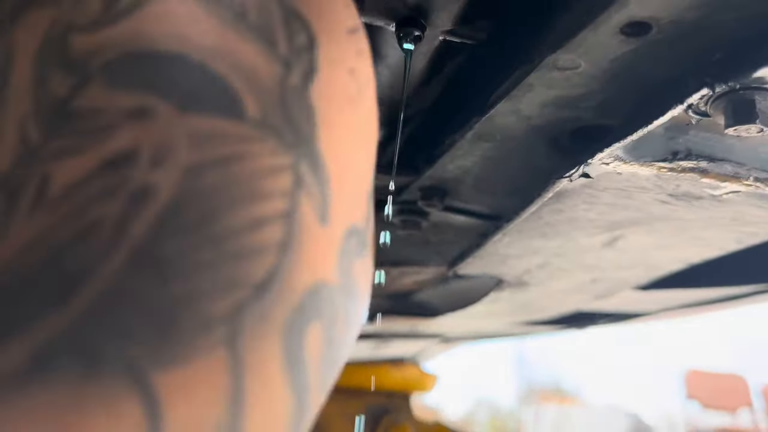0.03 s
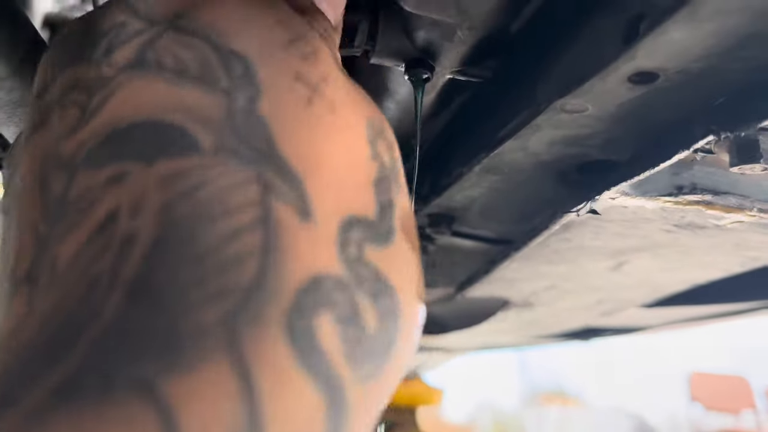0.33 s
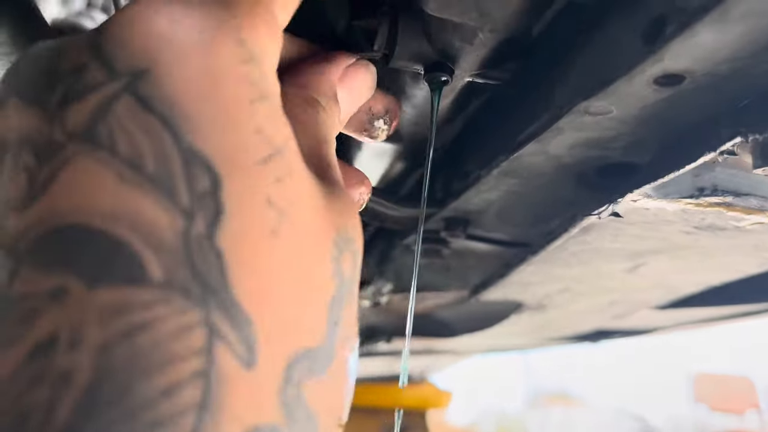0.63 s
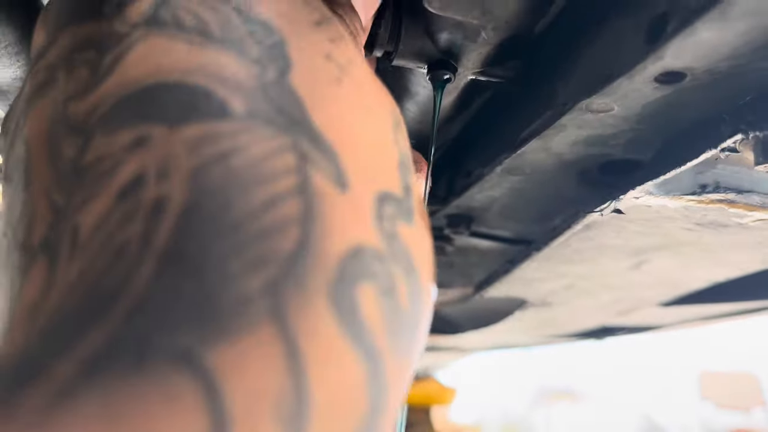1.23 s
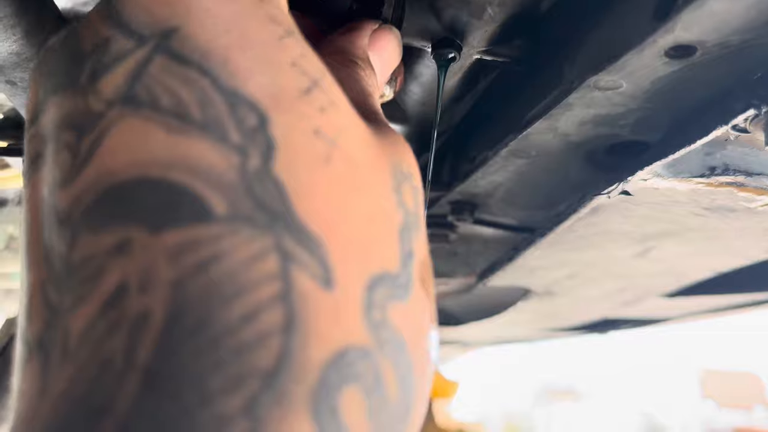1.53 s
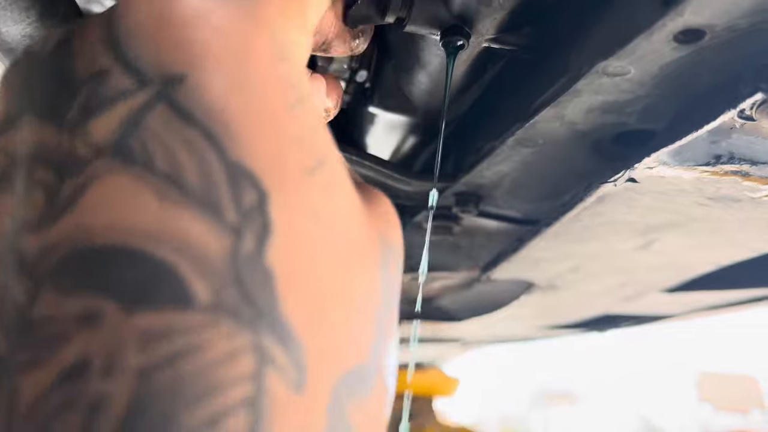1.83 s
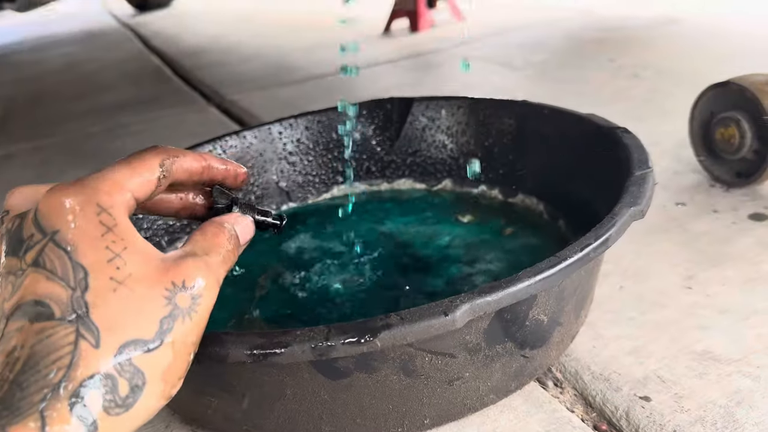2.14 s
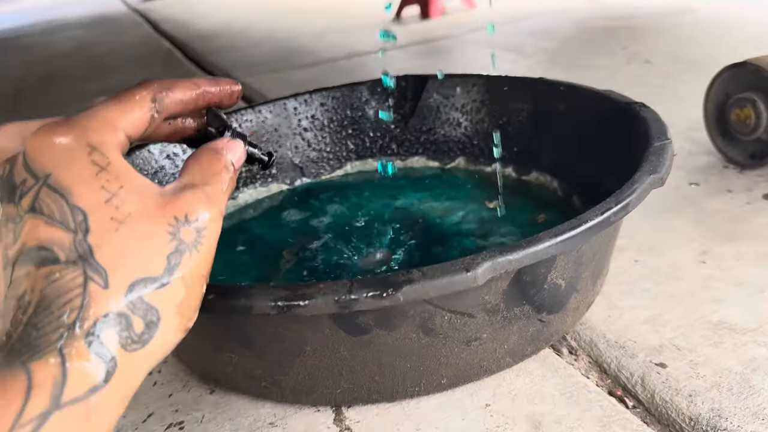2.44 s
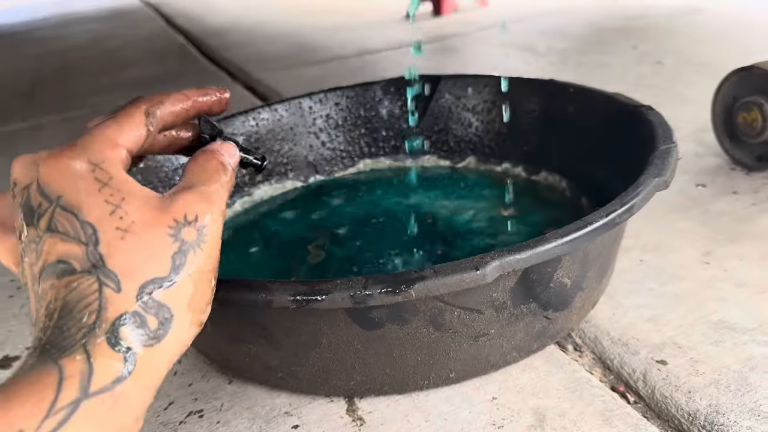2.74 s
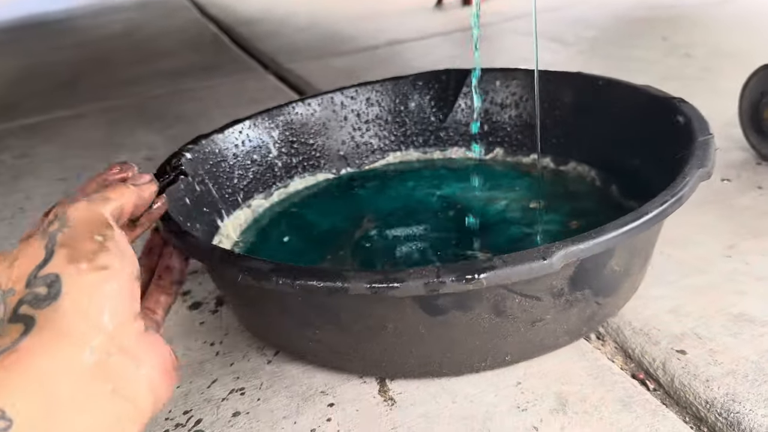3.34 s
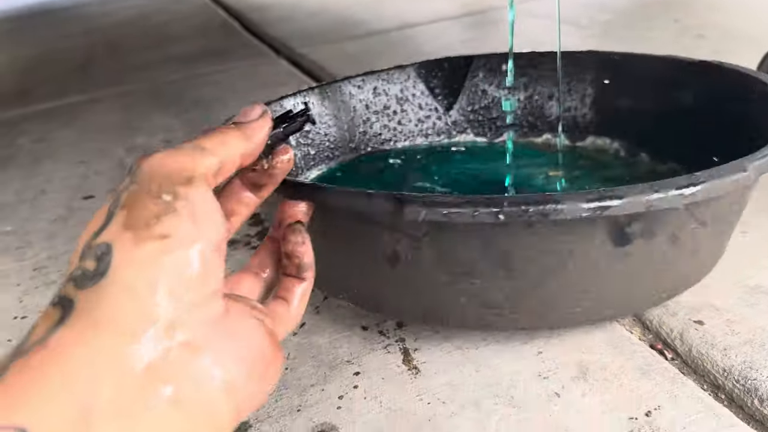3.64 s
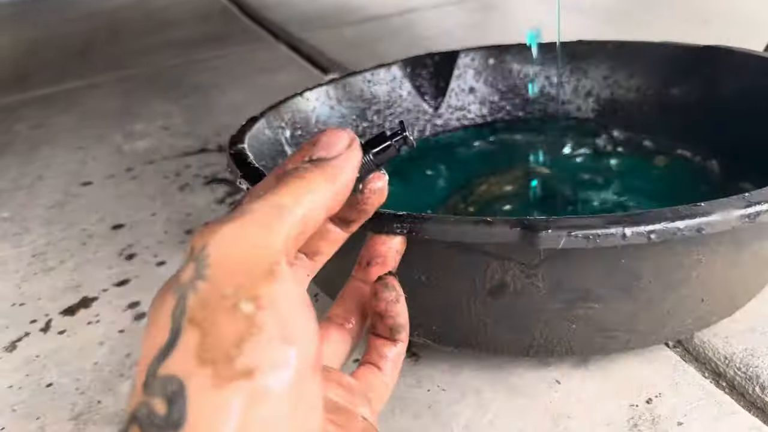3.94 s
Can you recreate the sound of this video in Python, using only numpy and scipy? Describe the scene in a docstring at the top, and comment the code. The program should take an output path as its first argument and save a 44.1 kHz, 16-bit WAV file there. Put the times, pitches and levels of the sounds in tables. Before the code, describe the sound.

Trickling liquid ticks faintly beneath a car, then is heard up close, splashing into a half-full drain pan with wet drops and small plinking bubbles. The engine idles throughout with a steady low hum and rumble.

```python
"""A few thin drips tick over an idling engine: coolant is trickling from a drain under a car.
After two seconds the level dips briefly and we are beside the half-full plastic drain pan,
where the broken stream patters and fizzes. Each drop is a wet crack, a tiny ringing bubble and
a short echo off the pan's walls; trapped bubbles plink and the pool gurgles softly.
Underneath, the engine hums at multiples of its cycle rate, throbs once a cycle and rumbles."""
import sys
import numpy as np
from scipy import signal
from scipy.fft import rfft, irfft, next_fast_len
from scipy.io import wavfile
from scipy.ndimage import uniform_filter1d, map_coordinates

SR = 44100
rng = np.random.default_rng(int(sys.argv[2]) if len(sys.argv) > 2 else 0)


def transcribe(u):
    """Save the signal u as a 16-bit wav file named by the first command-line argument.

    u: samples, shape (n,) or (channels, n), limited to [-1, 1]; the rate is SR.
    q: integer samples, one column per channel.
    """
    v = np.clip(np.atleast_2d(u).T, -1, 1)
    q = np.round(v * 32767).astype(np.int16)
    wavfile.write(sys.argv[1], SR, q)


N = 176400

# Single drips at the drain. Each row: start in seconds, level in dB, pitch in Hz.
DRAIN_DRIPS = [(0.4068, -35, 14050), (0.6149, -32.5, 14400), (0.658, -35.5, 13900), (0.6996, -42, 14400),
               (0.756, -35, 13900), (0.7763, -24, 14200), (0.811, -39, 13900), (0.8868, -27, 15350),
               (0.9168, -40, 14100), (0.9817, -37.5, 15150), (1.037, -46, 14500), (1.0935, -33.5, 14000),
               (1.2155, -41.5, 7870), (1.2526, -39.5, 15200), (1.2992, -35, 7700), (1.5307, -37, 14600),
               (1.8632, -46, 14300), (1.94, -34, 14500), (1.967, -34, 14100)]
# Fat drops in the pan. Each row: start in seconds, level in dB, pitch in Hz, slap send in dB.
FAT_DROPS = [(2.104, -27.5, 10900, -9), (2.121, -27, 6320, -9), (2.166, -32.5, 8500, -22),
             (2.2159, -22, 6580, -7), (2.305, -24.5, 13900, -27), (2.312, -29, 8050, -29),
             (2.3328, -29.5, 8050, -25), (2.3642, -27, 10960, -32), (2.3822, -28.5, 8230, -7),
             (2.4365, -30.5, 6840, -5), (2.4523, -23.5, 14500, -16.5), (2.51, -30, 8800, -2),
             (2.5251, -21.5, 7360, -25), (2.5628, -25, 7400, -18), (2.582, -20.5, 14500, -16),
             (2.593, -28, 7400, -17), (2.639, -27, 8770, -32), (2.6936, -16, 14660, -31),
             (2.696, -18.5, 8630, -20), (2.734, -28, 12100, -11), (2.771, -20.5, 14600, -14),
             (2.835, -20.5, 13800, -31), (2.8744, -29, 3630, -10.5), (2.882, -17, 14500, -18),
             (2.994, -18, 8060, -41), (3.0088, -16.5, 13700, -29), (3.025, -15.5, 14100, -25),
             (3.075, -24, 13700, -26), (3.1225, -26.5, 13800, -11), (3.233, -30.5, 8650, -6),
             (3.2483, -28, 13900, -13), (3.408, -27.5, 8270, -14), (3.5156, -30, 7840, -9.5),
             (3.626, -24.5, 5970, -23), (3.669, -24.5, 14100, -14.5), (3.734, -31, 8150, -25),
             (3.7596, -29, 8430, -8), (3.8749, -23, 8140, -33), (3.9356, -26, 7340, -17),
             (3.982, -22.5, 13700, -16)]
# Larger bubbles in the pan. Each row: start in seconds, level in dB, pitch in Hz.
BIG_BUBBLES = [(2.095, -34, 6720), (2.119, -34, 4100), (2.212, -32, 2430), (2.215, -44, 5700),
               (2.381, -38, 4310), (2.434, -29.5, 2500), (2.507, -38, 2630), (2.51, -32, 4740),
               (2.593, -33, 6550), (2.692, -37, 3400), (2.738, -39, 1850), (2.738, -50, 5080),
               (2.771, -38, 5940), (2.886, -33, 2270), (3.023, -35, 5250), (3.075, -45, 2840),
               (3.163, -31, 6600), (3.209, -31, 5050), (3.237, -31, 2670), (3.48, -31.5, 5140),
               (3.55, -39, 2440), (3.628, -29, 6030), (3.713, -35.5, 3730), (3.787, -32, 3320),
               (3.959, -35, 1015)]
# Fader rides for the landing stream and its gurgle. Each row: time in seconds, gain in dB.
FLOW_RIDE = [(2.03, 4.5), (2.2, 2), (2.29, -1), (2.4, -2), (2.49, -5), (2.54, -0.5), (2.75, 4), (2.95, 2.5),
             (3.1, 3.5), (3.29, 4), (3.45, 2), (3.76, 1), (3.84, -4.5), (4, -3)]
GURGLE_RIDE = [(2.03, -46), (2.22, -42.5), (2.33, -45.5), (2.43, -38), (2.5, -47), (2.56, -42), (2.75, -52),
               (2.95, -46), (3.12, -44), (3.45, -42.5), (3.6, -47), (3.78, -61), (3.96, -41.5)]
# Tone colours of the noise layers and the pan's echo. Each row: frequency in Hz, gain in dB.
SPLASH_EQ = [(500, -12), (1500, -25), (4000, -9), (6500, -10), (8500, 7.5), (10500, 4), (12500, 7.5),
             (14500, 3.5), (16000, 6)]
SLAP_EQ = [(600, -5), (2200, -0.5), (4500, 2.5), (7000, 6.5), (10000, -12), (16000, -33)]
PAN_ECHO_EQ = [(1000, -0.5), (6000, 12), (9000, -8), (15000, -8)]
FIZZ_EQ = [(400, -6), (1200, -3), (2400, 4), (3600, 2.5), (6500, 4.5), (8500, 7), (10500, -36.5),
           (12500, -4.5), (14500, 7), (16000, 0.5)]
GURGLE_EQ = [(300, -9.5), (560, 3.5), (850, 2.5), (1100, -4), (1600, -14), (3000, -19.5), (8000, -55)]
RUMBLE_EQ = [(20, -16), (45, -14), (80, 4), (150, -2.5), (260, -2.5), (380, -11), (520, -4.5), (700, -16),
             (1000, -20), (1600, -23.5), (2500, -31), (4000, -36), (7000, -43), (11000, -59.5),
             (15500, -51)]
# Stereo image of fizz and rumble. Each row: frequency in Hz, left-right likeness (1 is mono).
FIZZ_IMAGE = [(1000, 0.37), (4000, 0.063), (8000, 0.14), (14000, 0.8)]
RUMBLE_IMAGE = [(60, .98), (200, 0.41), (450, 0), (1000, 0.15), (2000, 0.0049), (8000, 0.034)]
# Idle speed, heard at each place. Each row: time in seconds, firings per second.
IDLE_DRAIN = [(0.1, 33.47), (0.65, 33.43), (1.12, 33.03), (1.5, 33.3), (1.68, 33.22), (1.92, 33.48)]
IDLE_PAN = [(2.1, 32.85), (2.25, 33.12), (2.5, 33.4), (3.17, 33.34), (3.3, 33.65), (3.66, 34.04)]
# The hum's tones at each place. Each row: multiple of the cycle rate, relative level in dB.
HUM_DRAIN = [(1, -38), (2, -28), (3, -25), (4, -2), (5, -19), (6, 0), (7, -25), (8, -6), (9, -16), (10, -9),
             (11, -18), (12, -3), (13, -17), (14, -20), (15, -20), (16, -30), (17, -25), (18, -16),
             (19, -28), (20, -25)]
HUM_PAN = [(1, -39), (2, -26), (3, -31), (4, 0), (5, -23), (6, 0), (7, -25), (8, -3), (9, -14), (10, -4),
           (11, -11), (12, -1), (13, -14), (14, -14), (15, -16), (16, -24), (17, -21), (18, -17), (19, -21),
           (20, -25)]
# Body resonances rung by the strongest firing. Each row: pitch in Hz, width in Hz, gain in dB.
BODY_MODES = [(451, 12, -2), (484, 11, 9), (579, 10, -9)]

MOVE_S, DIP_S = 2.003, 0.033  # move from drain to pan; half length of the dip
CRACK_T60_S, SLAP_T60_S, PAN_T60_S, BUBBLE_ECHO_T60_S = 0.013, 0.034, 0.055, 0.049
PATTER_PER_S, PATTER_DB = 65, -37.5
PLINKS_PER_S, PLINK_DB, PLINK_LOW_HZ, PLINK_OCTAVES = 54, -49, 694, 3.3
SPRAY_PER_S, SPRAY_DB, FIZZ_DB = 2300, -49, -46
SHADED_DB = -13  # extra cut on the pan's ticks and plinks, heard from the drain
EXHAUST_LAG_PERIODS, WALL_PHASE_HZ = 2.9, 374


def drop(hz, width_oct, skirt_db, echo_db):
    """One drop of peak 1: a wet crack, a tiny rising bubble and the pan's short echo."""
    def colour(f):
        bell = np.exp(-.5 * (np.log2((f + 1) / hz) / width_oct) ** 2)
        return amp(along(SPLASH_EQ, f)) * (amp(skirt_db) + bell)

    t = np.arange(SR // 20) / SR
    noise = rng.standard_normal((3, len(t)))
    crack = unit(filtered(noise[0], colour)) * amp(-60 * t / CRACK_T60_S)
    decay, phase = bubble(t, hz, cycles=210)
    ring = 2 * amp(-7) * decay * np.sin(phase)
    direct = from_right((crack + ring) * attack(t, 0.00035))
    echo = filtered(unit(filtered(noise[1:], colour)), lambda f: amp(along(PAN_ECHO_EQ, f)))
    sound = direct + echo * amp(echo_db - 60 * t / PAN_T60_S) * attack(t, 0.002)
    return sound / np.abs(sound).max()


def slap():
    """The duller smack of a fat drop, ringing briefly between the pan's walls."""
    t = np.arange(SR // 20) / SR
    noise = unit(filtered(rng.standard_normal((2, len(t))), lambda f: amp(along(SLAP_EQ, f))))
    return noise * amp(-60 * t / SLAP_T60_S) * attack(t, 0.0014)


def drips_and_drops():
    """Single drips tick at the drain; fat drops in the pan also slap the surface."""
    out = np.zeros((2, N))
    for s, db, hz in DRAIN_DRIPS:
        add(out, s, amp(db + 2.5) * drop(hz, width_oct=0.11, skirt_db=-11, echo_db=-6))
    for s, db, hz, slap_db in FAT_DROPS:
        splash = drop(hz, width_oct=0.16, skirt_db=-12, echo_db=-1)
        add(out, s, amp(db) * (splash + amp(slap_db + 3) * slap()))
    return out


def patter(flow_db):
    """The stream breaks into small drops that land at random."""
    out = np.zeros((2, N))
    for when, softness, pitch in rng.random((int(PATTER_PER_S * N / SR), 3)):
        db = PATTER_DB + flow_db[int(when * N)] - 3 * np.log(softness + 0.13)
        hz = 3000 + 12500 * np.sqrt(pitch)
        add(out, when * N / SR, amp(db) * drop(hz, width_oct=0.21, skirt_db=-21, echo_db=-2))
    return out


def bubble(t, hz, cycles):
    """Decay and phase of a ringing bubble: it bends upward while fading 60 dB over `cycles` periods."""
    life = t * hz / cycles
    return amp(-60 * life), 2 * np.pi * hz * t * (1 + .08 * np.minimum(life, 1))


def big_bubbles():
    """Each larger bubble rings for a few cycles and echoes between the pan's walls."""
    out, t = np.zeros((2, N)), np.arange(SR // 16) / SR
    for s, db, hz in BIG_BUBBLES:
        decay, phase = bubble(t, hz, cycles=20)
        ring = decay * attack(t, 0.0002) * np.sin(phase)
        walls = rng.standard_normal((2, len(t))) * amp(-60 * t / BUBBLE_ECHO_T60_S)
        echo = signal.fftconvolve(ring[None], walls / np.linalg.norm(walls[0]), axes=1)[:, :len(t)]
        sound = ring + amp(5.5) * echo
        add(out, s, amp(db - 0.5) * sound / np.abs(sound).max())
    return out


def plinks(flow_db):
    """Bubbles trapped by the drops ring briefly, scattered in pitch and across the stereo field."""
    out, t = np.zeros((2, N)), np.arange(SR // 12) / SR
    for when, softness, pitch, apart in rng.random((int(PLINKS_PER_S * N / SR), 4)):
        decay, phase = bubble(t, PLINK_LOW_HZ * 2 ** (PLINK_OCTAVES * pitch), cycles=100)
        ring = np.sin([phase, phase + 2 * np.pi * (apart - .5)])
        db = PLINK_DB + flow_db[int(when * N)] - 3 * np.log(softness + .05)
        add(out, when * N / SR, amp(db) * decay * attack(t, .0007) * ring)
    return out


def spray(flow_db):
    """Fine spray lands as dense, tiny noise bursts over a soft fizz."""
    when, softness = rng.random((int(SPRAY_PER_S * N / SR), 2)).T
    hits = np.bincount((when * N).astype(int), amp(-2.5 * np.log(softness + 0.056)), N)
    energy = signal.lfilter([1], [1, -np.exp(-1 / (0.00077 * SR))], hits ** 2)
    bursts = np.sqrt(np.abs(energy)) * rng.standard_normal(N)
    ticks = unit(filtered(bursts, lambda f: amp(along(SPLASH_EQ, f) - along(PAN_ECHO_EQ, f))))
    fizz = amp(FIZZ_DB) * noise_bed(FIZZ_EQ, FIZZ_IMAGE, patchy_db=4)
    return amp(flow_db) * from_right(amp(SPRAY_DB + by_place(SHADED_DB, 0)) * ticks + fizz)


def gurgle():
    """The low, soft, nearly mono churn where the stream plunges into the pool."""
    level = by_place(0, 0.91) * amp(curve(GURGLE_RIDE))
    return level * noise_bed(GURGLE_EQ, [(800, 0.95)], patchy_db=3.5)


def engine():
    """The idle: hum and throb, leaning left, over a broad rumble."""
    cycles = np.cumsum(curve(list(IDLE_DRAIN) + list(IDLE_PAN)) / 2) / SR
    # At each place, count from a moment when the strongest cylinder fires.
    cycles -= by_place(cycles[round(0.12 * SR)], cycles[round(2.144 * SR)])
    tone = by_place(amp(-19) * hum(cycles, HUM_DRAIN), amp(-19.9) * hum(cycles, HUM_PAN))
    body = amp(by_place(-45, -39)) * throb(cycles)
    rumble = amp(by_place(-32, -33.5)) * noise_bed(RUMBLE_EQ, RUMBLE_IMAGE, patchy_db=1.5)
    lean_left = amp(by_place(1.3, 2.1) * np.array([[.5], [-.5]]))
    return (tone + body) * lean_left + rumble


def hum(cycles, tones):
    """Exhaust hum of rms 1: gently wavering tones at multiples of the cycle rate."""
    out = np.zeros((2, N))
    left_lag_s = by_place(-0.00028, -0.00013)
    for k, db in tones:
        hz = k * np.gradient(cycles) * SR
        # Reflections scramble the two sides' phase, fully so above WALL_PHASE_HZ.
        scramble = rng.choice([-1, 1]) * np.minimum((hz / WALL_PHASE_HZ) ** 2, 1)
        apart = 2 * np.pi * hz * left_lag_s + scramble
        # High multiples keep looser time, as do the odd ones from unequal cylinders.
        looseness = (k / 34) ** 2 + k % 2 * .3
        offset = rng.normal(0, looseness) - EXHAUST_LAG_PERIODS * np.log(k)
        phase = 2 * np.pi * (k * cycles + offset)
        out += amp(db + 0.33 * wobble(14)) * np.sin([phase - apart / 2, phase + apart / 2])
    return unit(out)


def throb(cycles, jitter_s=.00008, scatter_db=1.5):
    """Once a cycle the strongest firing rings the body's resonances."""
    def body(f):
        return sum(amp(db) * 1j * f * width / (hz * hz - f * f + 1j * f * width)
                   for hz, width, db in BODY_MODES)

    firings = np.flatnonzero(np.diff(np.floor(cycles)) > 0)
    chance = rng.standard_normal((len(firings), 3))
    firings += np.round(chance[:, 2] * jitter_s * SR).astype(int)
    pulses = np.zeros((2, N))
    pulses[:, np.clip(firings, 0, N - 1)] = amp(scatter_db * chance[:, :2].T)
    return unit(filtered(pulses, body))


def noise_bed(eq, image, patchy_db):
    """Stereo noise of rms 1 that swells and thins in random patches of time and frequency."""
    def mid_side(hz):
        angle = np.arccos(np.clip(along(image, hz), -1, 1)) / 2
        return amp(along(eq, hz)) * [np.cos(angle), np.sin(angle)]

    spectra = signal.stft(rng.standard_normal((2, N)), nperseg=1024)[2]
    patches = uniform_filter1d(rng.standard_normal(spectra.shape[1:]), size=6, axis=0)
    patches = uniform_filter1d(patches, size=4, axis=1)
    pair = signal.istft(spectra * amp(patchy_db * unit(patches)), nperseg=1024)[1][:, :N]
    mid, side = filtered(pair, mid_side)
    return unit(np.array([mid + side, mid - side]))


def amp(db):
    return 10 ** (np.asarray(db) / 20)


def unit(x):
    return x / np.sqrt(np.mean(x ** 2) + 1e-20)


def attack(t, rise_s):
    return 1 - np.exp(-t / rise_s)


def along(points, hz):
    """Read (Hz, value) points on a log axis."""
    f, v = np.transpose(points)
    return np.interp(np.log(hz + 1), np.log(f + 1), v)


def curve(rows):
    """One value per sample from (seconds, value) rows."""
    return np.interp(np.arange(N) / SR, *np.transpose(rows))


def by_place(drain, pan):
    """The first value at the drain, the second beside the pan."""
    return np.where(np.arange(N) / SR < MOVE_S, drain, pan)


def wobble(rate):
    """A smooth random curve, `rate` knots a second."""
    return map_coordinates(rng.standard_normal(int(N * rate / SR) + 4), [np.arange(N) * rate / SR])


def filtered(x, response):
    """Shape x with a complex frequency response."""
    n = x.shape[-1]
    m = next_fast_len(n + n // 4)
    return irfft(rfft(x, m) * response(np.fft.rfftfreq(m, 1 / SR)), m)[..., :n]


def from_right(x, lag_s=.000363):
    """Place a sound to the right: it reaches the left microphone a little later."""
    return filtered(x, lambda hz: np.exp(-2j * np.pi * hz * np.array([[lag_s], [0]])))


def add(out, s, sound):
    """Mix a sound in at s seconds."""
    part = out[:, max(round(s * SR), 0):][:, :sound.shape[1]]
    part += sound[:, :part.shape[1]]


def scene():
    """Coolant over the idle; the fluttering stream is faint at the drain and close at the pan."""
    flow_db = by_place(-11, curve(FLOW_RIDE)) + 1.8 * wobble(29.67) * by_place(0.41, 0.81)
    ticks_db = flow_db + by_place(SHADED_DB, 0)
    bed = engine() + gurgle() + spray(flow_db)
    return bed + drips_and_drops() + big_bubbles() + patter(ticks_db) + plinks(ticks_db)


def record(dry, top_hz=15850):
    """The level dips as the listening place changes; the very top of the treble is cut."""
    dip = np.clip(np.abs(np.arange(N) / SR - MOVE_S) / DIP_S, .03, 1)
    return filtered(dry * dip, lambda hz: hz < top_hz)


dry = scene()
out = record(dry)
transcribe(out)
```